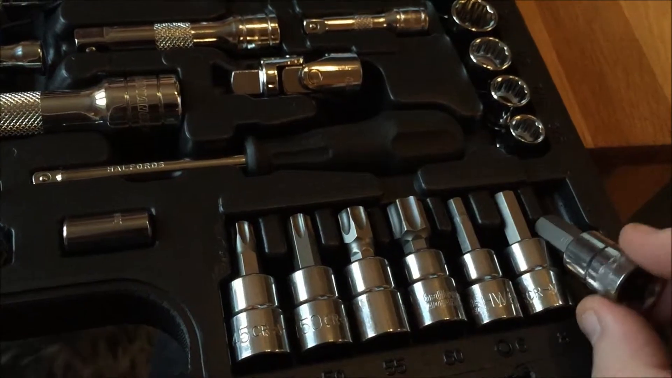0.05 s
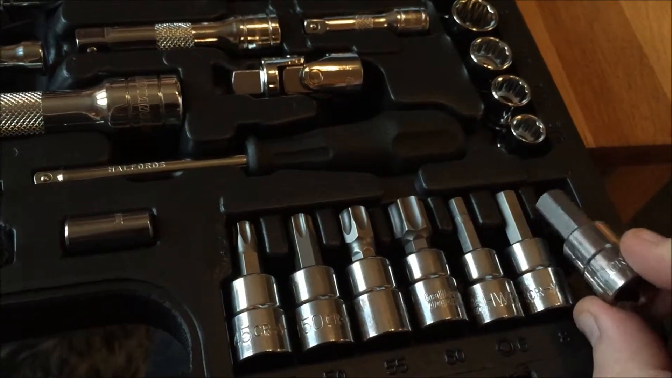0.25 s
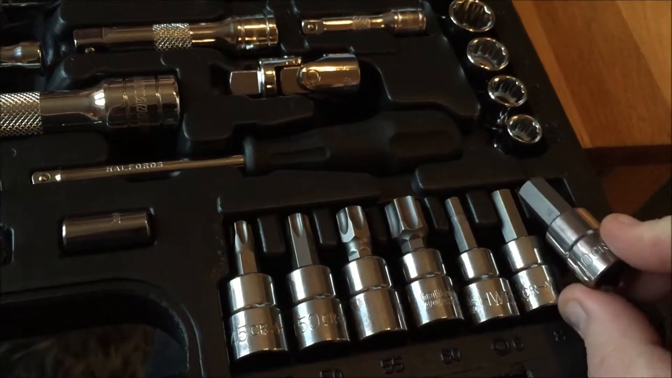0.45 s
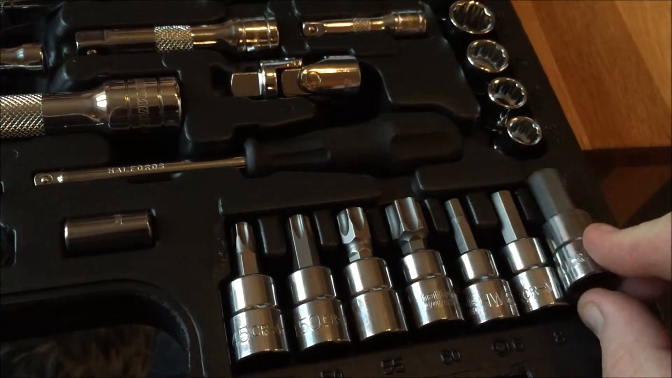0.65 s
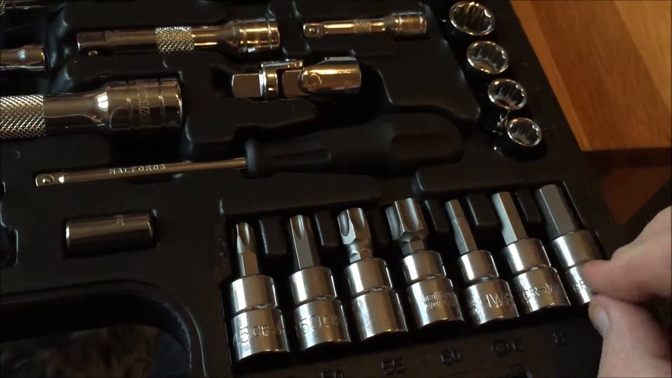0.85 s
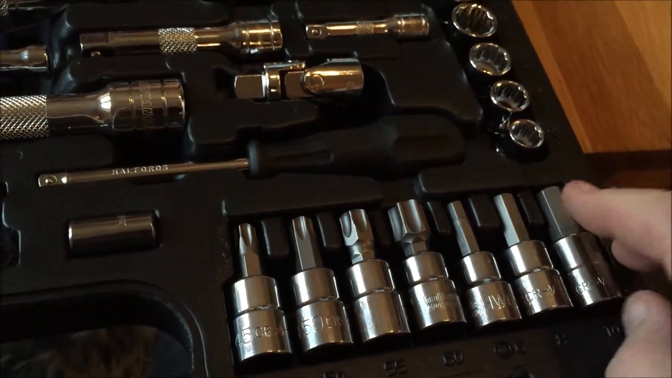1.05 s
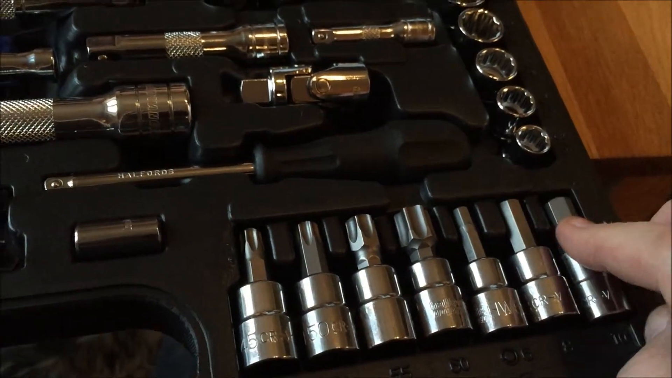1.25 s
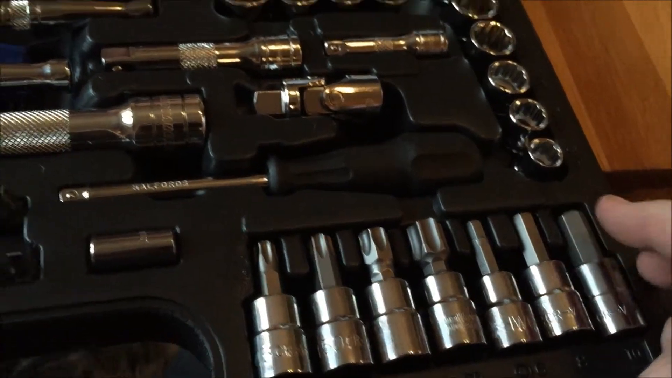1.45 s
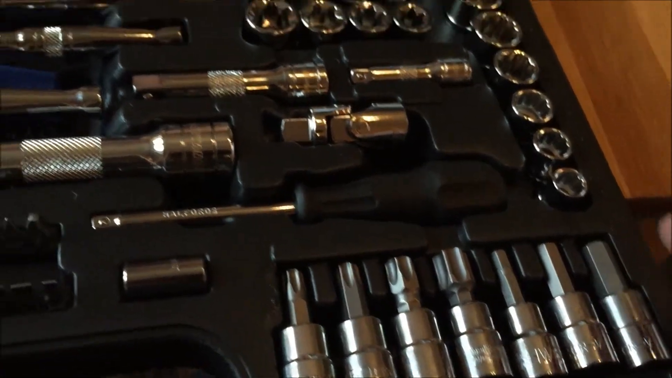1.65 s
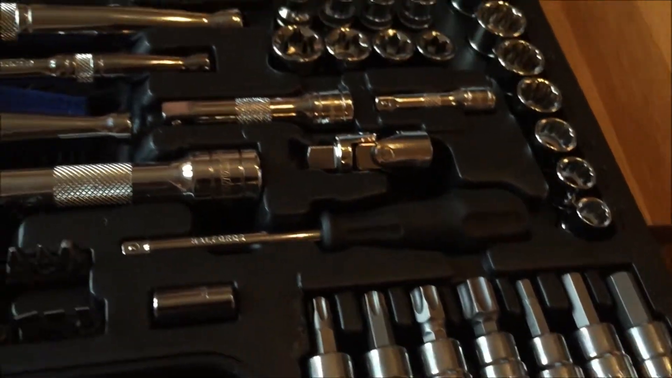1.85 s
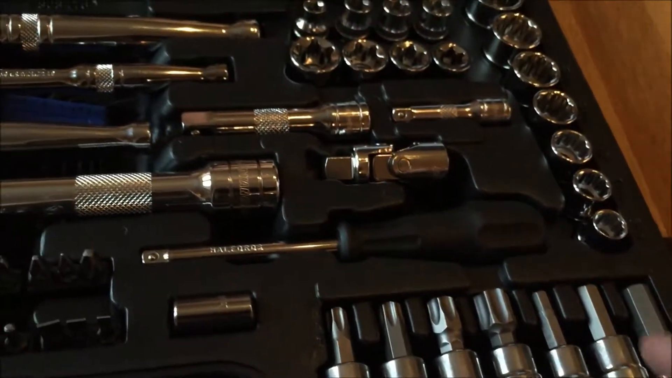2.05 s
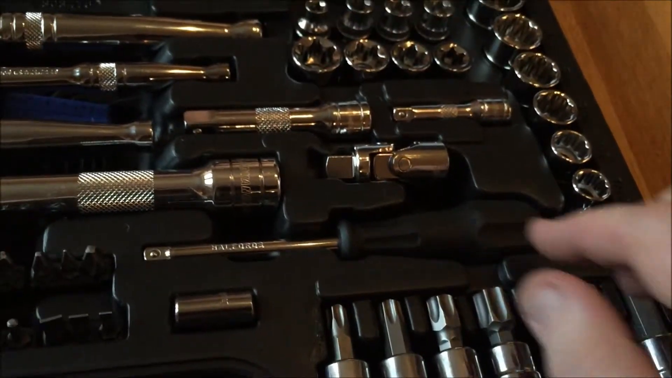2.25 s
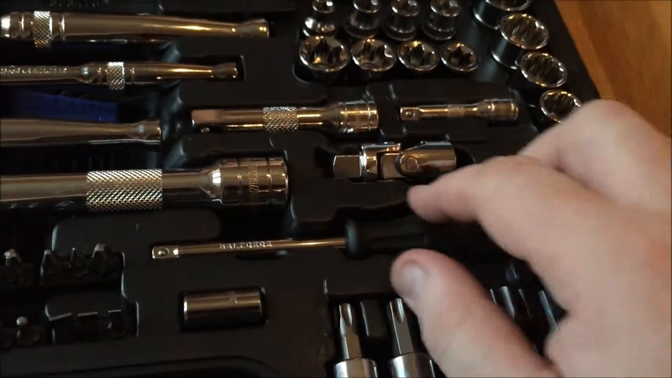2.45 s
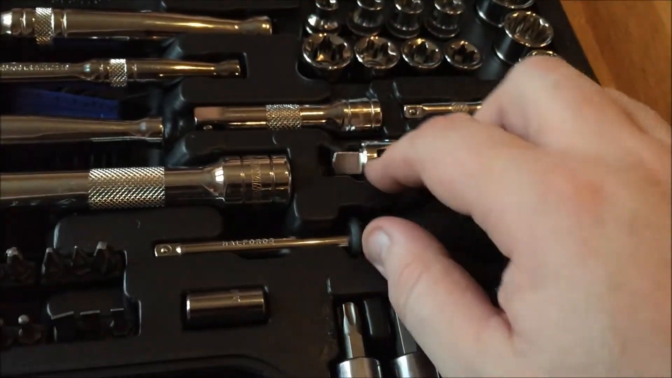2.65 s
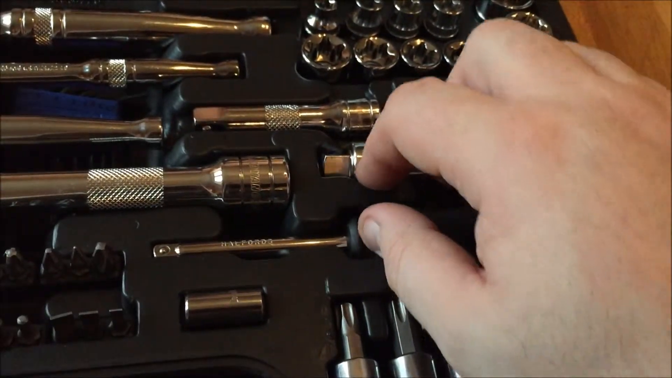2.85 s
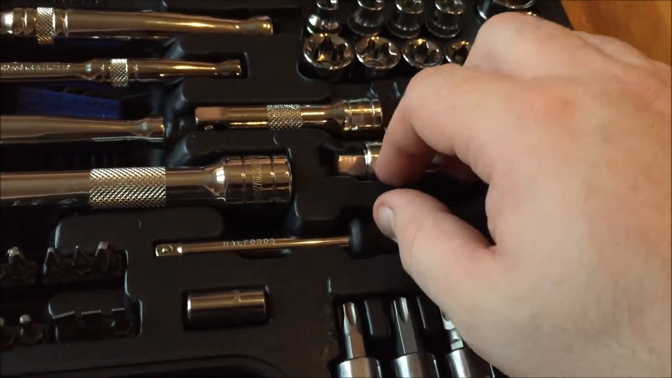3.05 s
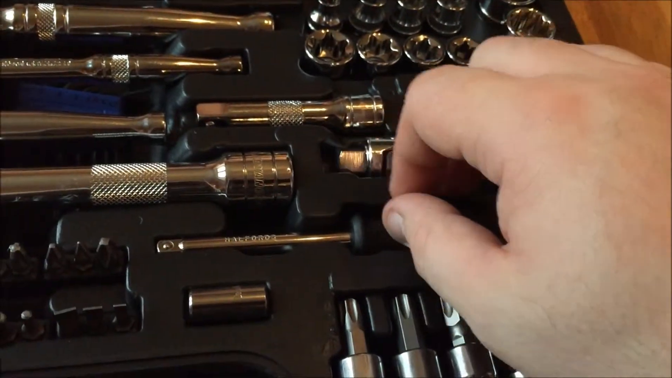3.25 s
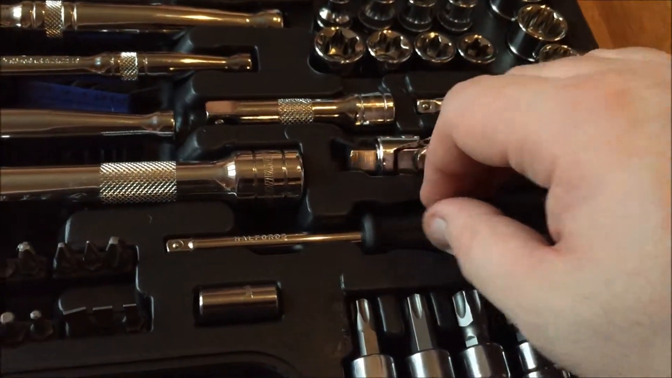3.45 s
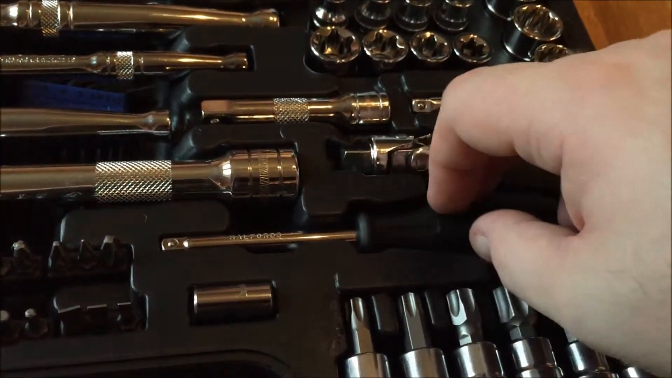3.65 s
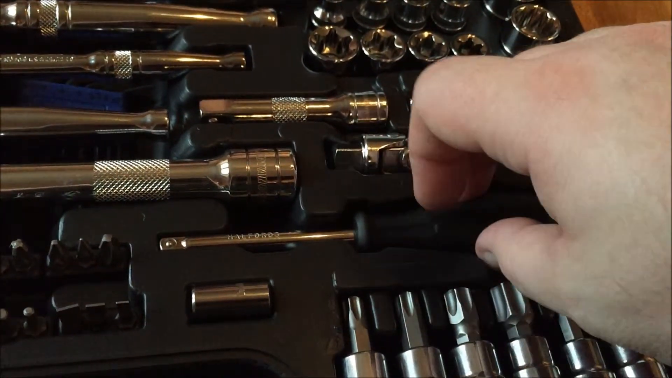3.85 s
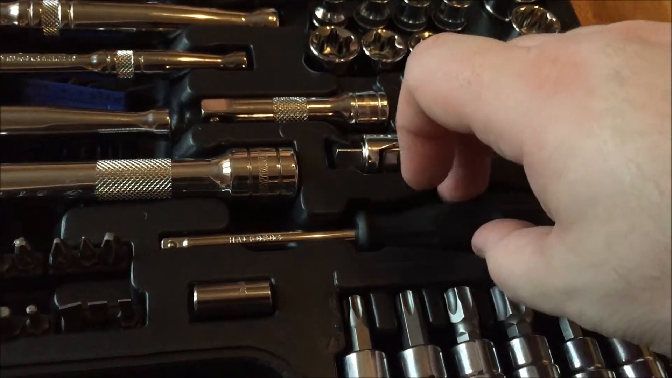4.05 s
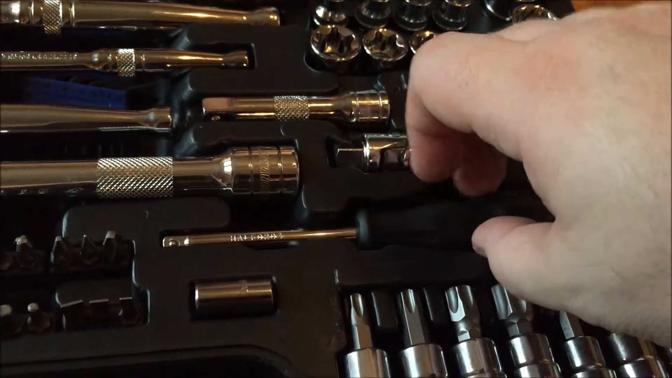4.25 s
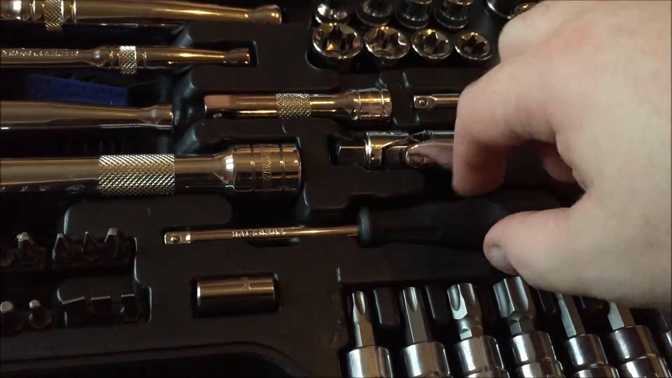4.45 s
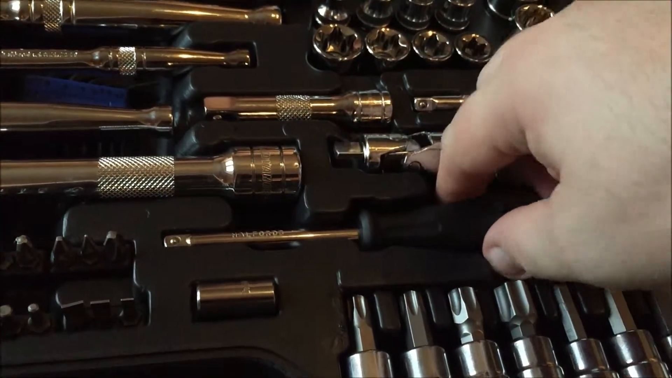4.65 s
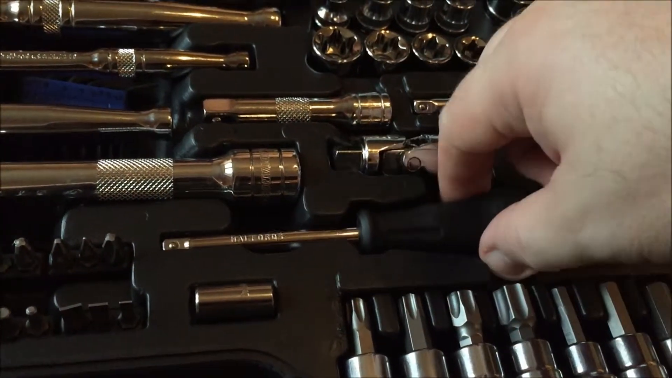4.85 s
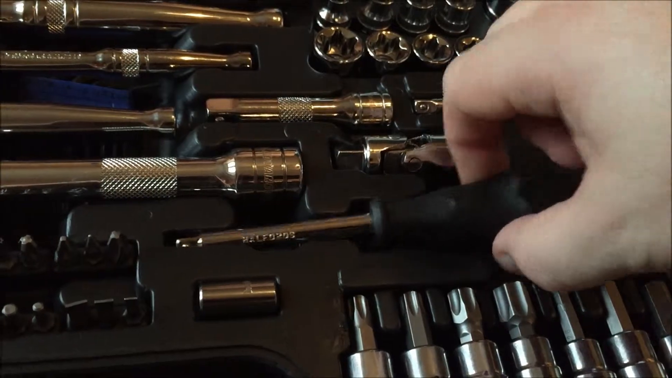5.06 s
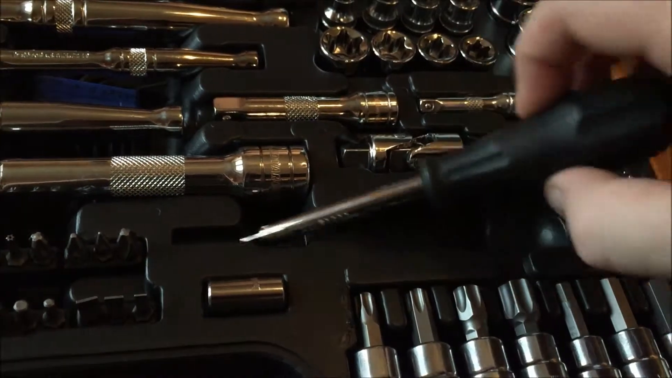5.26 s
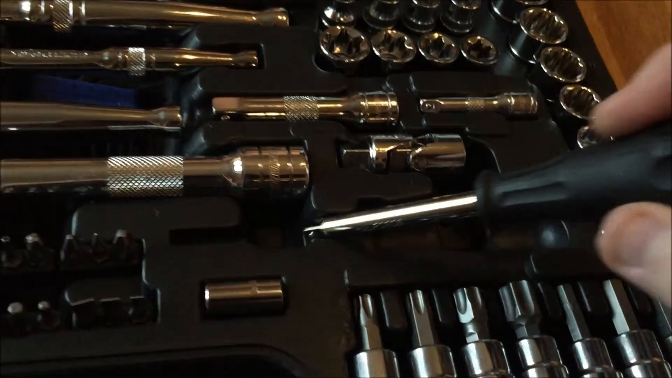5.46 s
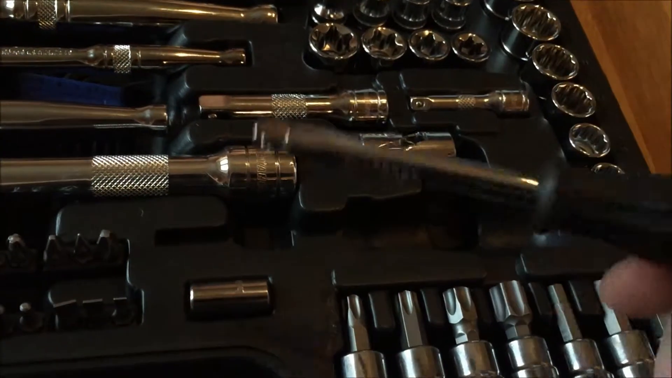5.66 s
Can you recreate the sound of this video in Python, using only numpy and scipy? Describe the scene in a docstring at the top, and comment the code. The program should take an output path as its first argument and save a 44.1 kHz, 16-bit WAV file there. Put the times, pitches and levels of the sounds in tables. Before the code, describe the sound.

Close, sharp plastic and metal clacks, a quiet spell of small ticks and skin rustles, then a hollow scrape and heavy knocks.

```python
"""In a small humming room, a hand drops a steel bit socket into a plastic tool case, then pulls out a driver.
Each knock rings the tray and shell modes, with a noisy crack and tick; steel strikes add a thin high ring.
Skin rubbing over tools, scrapes and the dragging handle are uneven friction noise through resonances.
The close microphone clips overloads and turns its gain down briefly after hard knocks."""
import sys
import numpy as np
from scipy import signal
from scipy.fft import rfft, irfft
from scipy.io import wavfile
from scipy.ndimage import uniform_filter1d, minimum_filter1d

SR = 44100
rng = np.random.default_rng(int(sys.argv[2]) if len(sys.argv) > 2 else 0)


def to_wav(s):
    """Save 16-bit WAV."""
    ch = np.atleast_2d(s).T  # columns
    pcm = np.round(np.clip(ch, -1, 1) * 32767)  # PCM
    wavfile.write(sys.argv[1], SR, pcm.astype(np.int16))


N = 252252

# tools knocking in the tray: start_s, level_db, centre_hz of the clack,
# weight_db (adds thump), hardness_db (adds tick)
TOOL_KNOCKS = [(0.008, -36.5, 1710, 8, -2.5), (0.193, -45, 2020, -38, 6), (0.3731, -11, 1580, -4, 0.5),
               (0.385, -30.5, 1820, 9.5, -10), (0.481, -29.5, 1950, 8, 4), (0.652, -34, 1530, -13, 7),
               (0.6846, -12.5, 1450, -5.5, -3), (0.691, -4.5, 1660, -54, -7), (0.7259, -14.5, 1530, 2, 0),
               (0.742, 0, 2030, -5, 1), (0.7488, -10.5, 1590, 8, -5), (0.782, 2, 1710, -7, 1.5),
               (0.802, -4.5, 1530, 0, 7), (0.8108, -16, 1306, 4, -7), (0.872, 0.5, 1610, -21, -3),
               (0.882, 4.5, 1820, -6, 3.5), (0.892, -18, 1215, 16, -4.5), (1.241, -27, 1943, 5.5, -1.5),
               (1.308, -23, 1316, 2.5, -5.5), (2.613, -30.5, 1680, 2, 6), (2.742, -12.5, 1750, 6.5, 1.5),
               (2.7492, -19, 800, 10.5, -19), (2.774, -23, 1450, -3, 2.5), (3.1314, -15, 1696, 4, 1.5),
               (3.211, -33.5, 1700, -27, -3.5), (3.532, -29.5, 1590, 4.5, 10),
               (3.909, -23.5, 1800, 4, -2.5), (3.975, -21.5, 1100, -3, 5.5), (3.987, -23, 1010, 9.5, 2.5),
               (4.16, -43.5, 1760, -6.5, 8), (4.277, -40.5, 1810, -18, 4.5), (4.372, -43.5, 2000, -14, 18),
               (4.453, -33.5, 1510, 1, 4.5), (4.463, -24.5, 1190, 3.5, 3.5), (4.6116, -26, 2020, 4.5, 12.5),
               (4.633, -25.5, 1400, -11, 2.5), (4.6443, -19, 1472, 10, 9), (4.836, -27.5, 1490, 4.5, -12.5),
               (4.891, -31.5, 1850, 5.5, -8.5), (4.940, -38, 1550, 5, -18), (5.102, -33, 2026, 6.5, 3.5),
               (5.172, -35, 895, 11, 9), (5.239, -31, 1350, 10.5, 0), (5.3257, -31, 2200, -13, 4.5),
               (5.3851, -3.5, 1420, 7.5, -3), (5.4272, 2, 1600, 16.5, 6), (5.439, -14.5, 700, 13.5, 0),
               (5.471, -11.5, 1800, 7, 0), (5.492, -21.5, 1730, 9.5, 6.5), (5.523, -32, 1600, 15, -8),
               (5.581, -29, 840, -9, -6)]
# the driver's handle dragging in its clip, first eased, then pulled: start_s, length_s, level_db
HANDLE_DRAGS = [(5.057, 0.16, -52), (5.23, 0.1317, -37.5)]
# the handle and its clip: mode_hz, level_db, t60_s
HANDLE_MODES = [(409, -5, 0.053), (516, -0.5, 0.02), (846, 8, 0.024), (1330, -7, 0.0099), (2020, 1, 0.025),
                (2176, 4.5, 0.019)]
# the tick of a hard contact: frequency_hz, level_db
TICK_COLOUR = [(500, -23.5), (2000, 8.5), (3700, 6.5), (5500, 2), (7800, -4.5), (10500, -9), (13000, -10),
               (16000, -22)]

SEAT_S = 0.0048  # from a knock to the tool seating in its slot
LEAD_IN_S = 0.026  # length of the soft noise that swells up to a knock
STROKE_CURVE = 0.64  # loudness of a slide as a power of its speed
FOCUS = 5.2  # narrowing of a knock of neutral weight, dB per octave squared


def undb(db):
    """Decibels to gain."""
    return 10 ** (np.asarray(db) / 20)


def unit(x):
    """Scale to rms 1."""
    return x / np.sqrt(np.mean(x ** 2))


def punch(x):
    """Scale a blow so that its energy equals 5 ms at rms 1."""
    return x / np.sqrt(np.sum(x ** 2) / (SR / 200))


def by_hz(hz, table):
    """Read a table on a log-frequency axis."""
    table_hz, value = np.transpose(table)
    return np.interp(np.log(hz + 1), np.log(table_hz), value)


def colour(x, table):
    """Minimum-phase filter with the given response: frequency_hz, level_db."""
    size = 1024
    hz = np.arange(size + 1) * SR / (2 * size)
    cepstrum = irfft(np.log(undb(by_hz(hz, table))))
    # folding the cepstrum forward gives minimum phase
    cepstrum[1:size] *= 2
    cepstrum[size + 1:] = 0
    response = irfft(np.exp(rfft(cepstrum)))
    return signal.oaconvolve(x, response)[:len(x)]


def fade(t, t60):
    """Decay by 60 dB in t60 seconds."""
    return np.exp(-np.log(1000) * t / np.maximum(t60, 1e-3))


def ring(modes, t, weights=1, detune=1):
    """Impulse response of a set of damped modes."""
    hz, db, t60 = np.transpose(modes)
    waves = np.sin(2 * np.pi * (hz * detune)[:, None] * t)
    return (weights * undb(db)) @ (waves * fade(t, t60[:, None]))


def resonate(x, hz, width_hz):
    """A resonance whose centre moves: shift it to zero, smooth with one pole, shift back."""
    turn = np.exp(2j * np.pi * np.cumsum(hz) / SR)
    pole = np.exp(-np.pi * width_hz / SR)
    return np.real(turn * signal.lfilter([1], [1, -pole], x / turn))


def add(out, s, sound):
    """Mix a sound in at time s."""
    i = max(int(s * SR), 0)
    out[i:i + len(sound)] += sound[:N - i]


def friction(size, grain_db):
    """A dense run of tiny slips of very unequal size, each lasting 32 samples."""
    grains = np.minimum(rng.exponential(size=size // 32 + 1), 5)
    return rng.standard_normal(size) * undb(grain_db * np.repeat(grains, 32)[:size])


def background(air_db=-52):
    """Steady mains hum as a sine over dull filtered room noise."""
    # mains hum: frequency_hz, rms_db
    hum_tones = [(100.05, -38)]
    # room noise: frequency_hz, level_db
    air_colour = [(25, -13.5), (50, -4.5), (150, -4.5), (190, 0.5), (300, -6.5), (480, -25.5), (800, -26),
                  (1900, -28), (2800, -36), (6000, -40.5), (15000, -46.5)]
    t = np.arange(N) / SR
    hum = sum(np.sqrt(2) * undb(db) * np.sin(2 * np.pi * hz * t) for hz, db in hum_tones)
    return hum + undb(air_db) * unit(colour(rng.standard_normal(N), air_colour))


def room(x, wet_db=-15.0, early_db=-13, early_t60=0.15, gap_s=0.0029, build_s=0.0013):
    """Quick reflections off lid and table, plus a diffuse tail whose midrange lingers longest."""
    # reverberation: frequency_hz, t60_s
    room_decay = [(300, 0.3353), (2200, 0.46), (6000, 0.4)]
    # colour of the reflections: frequency_hz, level_db
    room_colour = [(100, -8), (300, 5), (900, 0.5), (1800, -4), (5000, -2.5), (12000, -7)]
    t = np.arange(SR) / SR
    tail = np.zeros(SR)
    edges = np.geomspace(100, 18000, 9)
    for lo, hi in zip(edges, edges[1:]):
        band_filter = signal.butter(3, [lo, hi], "band", fs=SR, output="sos")
        band = signal.sosfilt(band_filter, rng.standard_normal(SR))
        tail += band * fade(t, by_hz(np.sqrt(lo * hi), room_decay))
    tail *= 1 - np.exp(-t / build_s)
    early = rng.standard_normal(SR) * fade(t, early_t60) * (t > gap_s)
    response = (undb(wet_db) * unit(tail) + undb(early_db) * unit(early)) / np.sqrt(SR)
    return x + signal.fftconvolve(x, colour(response, room_colour))[:N]


def fingers(rasp_db=-1, hiss_db=1, hollow_share=0.65, overtone_db=-16):
    """Sliding skin hisses and sounds the hollow under the hand; each stroke swells, catches and lets go."""
    # fingers over tools and tray: start_s, length_s, rasp_db and hiss_db before their trims,
    # hollow_hz (pitch of the hollow at mid-stroke, before its wander)
    strokes = [(0.392, 0.14, -45.5, -61.5, 2100), (0.581, 0.31, -50, -64, 1950),
               (2.546, 0.1, -50, -59.5, 2164), (2.598, 0.051, -42, -50, 1700),
               (2.637, 0.15, -48.5, -56, 1900), (2.923, 0.07, -51, -67.5, 1840),
               (3.058, 0.12, -43.5, -64, 1800), (3.269, 0.11, -42.5, -50, 1740),
               (3.248, 0.25, -49.5, -66, 1670), (3.626, 0.11, -43, -54.5, 1920),
               (3.764, 0.06, -47, -72.5, 2100), (4.024, 0.11, -49, -75, 1810),
               (4.477, 0.14, -44, -56.5, 1800), (5.022, 0.12, -45.5, -65.5, 1795)]
    # lower rubbing sound of skin: frequency_hz, level_db
    rasp_colour = [(300, -24), (700, -20.5), (1250, -3), (1750, 8), (2300, 2.5), (3200, -1), (4500, -17.5),
                   (8000, -33)]
    # high rubbing sound of skin: frequency_hz, level_db
    hiss_colour = [(1500, -9.5), (3500, 6.5), (6300, 8), (8500, -0.5), (12500, 5.5), (15500, -0.5)]
    # the hollow wanders (rms) and sinks in pitch as the fingers close in
    hz_per_s, wander_hz, width_hz = -700, 50, 170
    rise_share = 0.47  # share of a stroke spent speeding up
    out, t = np.zeros(N), np.arange(SR // 3) / SR
    gaps_hz = np.geomspace(1200, 16000, 45)
    for start, length, low_db, high_db, hollow_hz in strokes:
        slips = colour(friction(len(t), grain_db=4.0), rasp_colour)
        wander = unit(uniform_filter1d(rng.standard_normal(len(t)), SR // 25))
        hz = hollow_hz + hz_per_s * (t - length / 2) + wander_hz * wander
        hollow = unit(resonate(slips, hz, width_hz))
        # open at one end, the hollow also sounds at three times its pitch
        overtone = unit(resonate(slips, 3 * hz, width_hz))
        rasp = unit(unit(slips) + hollow_share * hollow + undb(overtone_db) * overtone)
        hiss = unit(colour(friction(len(t), grain_db=3.0), hiss_colour))
        unevenness = unit(uniform_filter1d(rng.standard_normal(len(t)), SR // 60))
        catch = undb(2 * np.tanh(unevenness))
        speed = np.interp(t / length, [0, rise_share, 1], [0, 1, 0])
        rub = undb(low_db + rasp_db) * rasp + undb(high_db + hiss_db) * hiss
        stroke = speed ** STROKE_CURVE * catch * rub
        # the narrow spaces between hand and tools give every stroke its own peaks and notches
        gaps_db = rng.uniform(-6, 5, len(gaps_hz))
        add(out, start, colour(stroke, np.column_stack([gaps_hz, gaps_db])))
    return out


def handle(level_db=0, grit_db=-24, slip_db=3):
    """Stick and slip of the plastic handle makes a short creaking scrape."""
    attack_s, release_s = 0.0055, 0.01
    out, t = np.zeros(N), np.arange(SR // 4) / SR
    for start, length, db in HANDLE_DRAGS:
        unevenness = unit(uniform_filter1d(rng.standard_normal(len(t)), SR // 100))
        slips = undb(slip_db * np.tanh(unevenness)) * friction(len(t), grain_db=2.5)
        body = signal.fftconvolve(slips, ring(HANDLE_MODES, t[:SR // 12]))[:len(t)]
        pull = undb(db) * np.clip(np.minimum(t / attack_s, (length - t) / release_s), 0, 1)
        grit_layer = undb(grit_db) * unit(colour(slips, TICK_COLOUR))
        add(out, start, pull * (undb(level_db) * unit(body) + grit_layer))
    return out


def snags(grit_db=-10, grit_t60=0.0069):
    """Sharp little catches ring the handle at random moments while it drags."""
    per_s, relative_db, scatter_db = 50, -5, 5  # level relative to the drag, standard deviation
    out, t = np.zeros(N), np.arange(SR // 30) / SR
    for start, length, db in HANDLE_DRAGS:
        for _ in range(round(per_s * length)):
            snag_db = db + relative_db + scatter_db * rng.standard_normal()
            noise = colour(rng.standard_normal(len(t)) * fade(t, grit_t60), TICK_COLOUR)
            snag = punch(ring(HANDLE_MODES, t)) + undb(grit_db) * punch(noise)
            add(out, start + length * rng.random(), undb(snag_db) * snag)
    return out


def crack(size, centre_hz, focus, scatter_s=.0018):
    """Bending waves cross the ribbed tray by many paths, delaying each frequency of a blow differently."""
    # dull crack of the plastic under a blow: frequency_hz, level_db
    crack_colour = [(300, -23), (600, -8.5), (900, -3.5), (1400, -2.5), (1850, -2), (2400, -5.5),
                    (3100, -16), (4500, -27), (9000, -44)]
    hz = np.arange(size // 2 + 1) * SR / size
    paths_hz = np.arange(0, SR / 2, 350)
    delay_s = scatter_s * np.interp(hz, paths_hz, .3 + rng.exponential(size=len(paths_hz)))
    gain = undb(by_hz(hz, crack_colour) - focus * np.log2((hz + 1) / centre_hz) ** 2)
    # summing delay over frequency gives phase
    phase = 2 * np.pi * np.cumsum(delay_s) * SR / size
    return irfft(gain * np.exp(-1j * phase), size) * np.linspace(1, 0, size) ** 2


def grit(size, centre_hz, grain_db=4.5, spread_octaves=.3, tick_db=-17, count=3):
    """Tiny uneven contacts at a few spots on the tray, each spot with its own pitch."""
    out = np.zeros(size)
    for octaves in np.linspace(-spread_octaves, spread_octaves, count):
        contacts = friction(size, grain_db)
        spot = crack(SR // 50, centre_hz * 2 ** octaves, FOCUS)
        body = signal.fftconvolve(contacts, spot)[:size]
        out += unit(body) + undb(tick_db) * unit(colour(contacts, TICK_COLOUR))
    return unit(out)


def scrapes():
    """A tool grates along its slot, speeding up and stopping again."""
    # steel dragged briefly over grained plastic: start_s, length_s, level_db, centre_hz
    slides = [(2.806, 0.12, -52.5, 2540), (3.652, 0.074, -43.5, 3000), (4.497, 0.1, -46.5, 1890),
              (4.622, 0.035, -24, 1650)]
    out, t = np.zeros(N), np.arange(SR // 6) / SR
    for start, length, db, centre_hz in slides:
        speed = np.interp(t / length, [0, .5, 1], [0, 1, 0])
        add(out, start, undb(db) * speed ** STROKE_CURVE * grit(len(t), centre_hz))
    return out


def rattles():
    """The neighbouring sockets shiver in their slots after each hard knock, as decaying grit."""
    jolt_above_db, relative_db, t60_s = -3, -33.5, 0.35  # relative to the knock
    out, t = np.zeros(N), np.arange(SR // 3) / SR
    for s, db, centre_hz, _, _ in TOOL_KNOCKS:
        if db > jolt_above_db:
            shiver = fade(t, t60_s) * grit(len(t), centre_hz)
            add(out, s + SEAT_S, undb(db + relative_db) * shiver)
    return out


def clinks():
    """The socket strikes its neighbour and rings high and short, damped by fingers and plastic."""
    # steel on steel: start_s, level_db, pitch_factor
    strikes = [(0.685, -19, 1), (0.743, -11, 1), (0.854, -22, 0.975)]
    # the steel socket, before the pitch factor: mode_hz, level_db, t60_s
    steel_modes = [(11380, -8.5, 0.06), (11690, -5.5, 0.061), (14730, -18.5, .03)]
    out, t = np.zeros(N), np.arange(SR // 12) / SR
    for s, db, pitch in strikes:
        add(out, s, undb(db) * ring(steel_modes, t, detune=pitch))
    return out


def lead_in(centre_hz, grain_db=3, rise=2.7):
    """A short soft noise swells up to each knock, uneven in grain and coloured like its crack."""
    swell = np.linspace(0, 1, int(LEAD_IN_S * SR)) ** rise
    noise = friction(len(swell), grain_db)
    body = signal.fftconvolve(noise, crack(SR // 50, centre_hz, 0))[:len(swell)]
    return swell * unit(body)


def blow(db, centre_hz, weight_db, hardness_db, ring_db=-5.5, crack_db=-6.5, chatter=0.094,
         chatter_t60=.012, tick_t60=0.029, snap_t60=0.0056, snap=0.78, spread_db=2.5,
         contact_s=0.00013, softening=1.0):
    """One blow with brief chatter; where it lands decides how strongly each tray mode answers."""
    # the tray loaded with tools, before random detuning: mode_hz, level_db, t60_s
    tray_modes = [(667, -7, 0.031), (838, -8, 0.057), (922, -4, 0.043), (1034, -4, 0.034),
                  (1222, -8, 0.041), (1489, -5.5, .028), (1669, -3, 0.028), (1801.6, 0.5, 0.026),
                  (2098, -2, 0.022), (2173, -3, 0.041), (2394, -6.5, 0.035), (2810, -6, 0.018),
                  (2907, -10, 0.022), (3133, -7, 0.022)]
    # the hollow shell of the case: mode_hz, level_db, t60_s
    shell_modes = [(172, -9.5, 0.13), (243, 3.5, 0.081), (331.5, -4.5, 0.13), (370, -2, 0.08),
                   (454, -6, 0.04), (527, -1, 0.05), (640, -2, 0.037)]
    # the shell thumps even under a light touch and grows slowly with force; the tick keeps step
    thump_db, thump_db_per_db, tick_db = -26, 0.65, -22.5
    t = np.arange(SR // 14) / SR
    tray_hz = np.array(tray_modes)[:, 0]
    # a light, glancing knock rings a narrow band of the tray, a weighty one all of it
    focus = FOCUS * np.exp(-.045 * weight_db)
    # the plastic gives before it pushes back, longer under a light touch
    press = 1 - np.exp(-t / (contact_s * undb(-softening * db)))
    force = chatter * rng.standard_normal(len(t)) * fade(t, chatter_t60)
    force[0] += 1
    place_db = spread_db * rng.standard_normal(len(tray_hz)) - focus * np.log2(tray_hz / centre_hz) ** 2
    place = rng.choice([-1, 1], len(tray_hz)) * undb(place_db)
    # tools and fingers load the tray differently each time, which shifts its modes
    load = 1 + .01 * rng.standard_normal(len(tray_hz))
    rattle = press * signal.fftconvolve(force, ring(tray_modes, t, place, load))[:len(t)]
    crack_noise = press * crack(len(t), centre_hz, focus)
    clack = undb(ring_db) * punch(rattle) + undb(crack_db) * punch(crack_noise)
    shell_gain = undb(spread_db * rng.standard_normal(len(shell_modes)))
    thump = ring(shell_modes, t, rng.choice([-1, 1], len(shell_modes)) * shell_gain)
    tick_fade = snap * fade(t, snap_t60) + fade(t, tick_t60)
    tick = colour(press * rng.standard_normal(len(t)) * tick_fade, TICK_COLOUR)
    thump_gain = undb(thump_db + thump_db_per_db * db + weight_db)
    tick_gain = undb(db + tick_db + hardness_db)
    return undb(db) * clack + thump_gain * punch(thump) + tick_gain * punch(tick)


def knocks(count=3):
    """After a soft swell, each tool strikes the tray, seats and rocks to rest in uneven, shrinking taps."""
    lead_in_db, lead_in_db_per_db = -35, 0.38  # the swell grows slowly with the level of the knock
    seat_db, seat_hardness_db = -16.5, 0.5  # relative to the knock
    rock_gap_s, rock_db, rock_step_db, rock_weight_db = .014, -20, -4, -0.5  # mean gap; step per tap
    out = np.zeros(N)
    for s, db, centre_hz, weight_db, hardness_db in TOOL_KNOCKS:
        if s > LEAD_IN_S:
            swell_gain = undb(lead_in_db + lead_in_db_per_db * db)
            add(out, s - LEAD_IN_S, swell_gain * lead_in(centre_hz))
        add(out, s, blow(db, centre_hz, weight_db, hardness_db))
        rest_hardness_db = hardness_db + seat_hardness_db
        add(out, s + SEAT_S, blow(db + seat_db, centre_hz, weight_db, rest_hardness_db))
        gaps = rock_gap_s * (.5 + rng.random(count))
        for k, delay in enumerate(np.cumsum(gaps)):
            tap_db = db + rock_db + k * rock_step_db
            tap = blow(tap_db, centre_hz, weight_db + rock_weight_db, rest_hardness_db)
            add(out, s + SEAT_S + delay, tap)
    # the knocks carry little deep bass
    return signal.sosfilt(signal.butter(2, 140, "high", fs=SR, output="sos"), out)


def scene():
    """All the handling sounds in the room, over its background."""
    friction_sounds = fingers() + handle() + snags() + scrapes()
    impacts = rattles() + clinks() + knocks()
    return (background() + room(friction_sounds + impacts))[None]


def record(dry, threshold=0.36, duck_db=-3.0, hold_s=0.21, slew_s=0.011):
    """Loud moments pull the gain down for a while; overloads clip and the top is cut."""
    top_hz = 15400
    loud = np.sqrt(np.abs(uniform_filter1d(dry[0] ** 2, SR // 250)))
    hold = int(hold_s * SR)
    # the shifted window keeps the gain down after each loud moment
    ducked = np.where(loud > threshold, undb(duck_db), 1)
    gain = minimum_filter1d(ducked, hold, origin=(hold - 1) // 2)
    pole = np.exp(-1 / (slew_s * SR))
    gain = 1 + signal.lfilter([1 - pole], [1, -pole], gain - 1)
    top_cut = signal.ellip(10, .2, 90, top_hz, fs=SR, output="sos")
    return signal.sosfilt(top_cut, np.clip(dry * gain, -1, 1))


dry = scene()
out = record(dry)
to_wav(out)
```